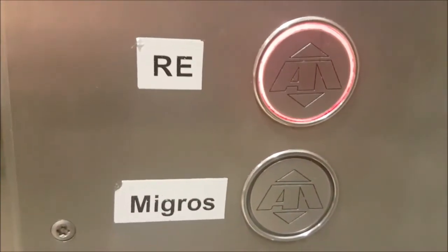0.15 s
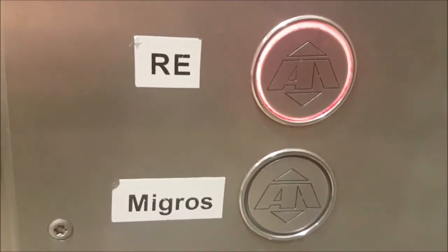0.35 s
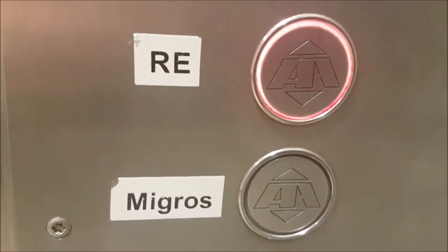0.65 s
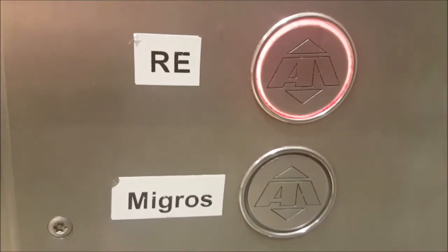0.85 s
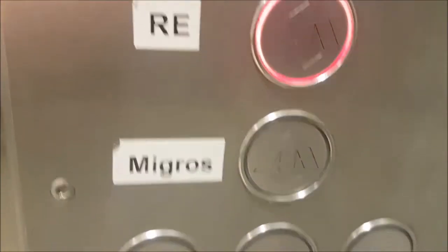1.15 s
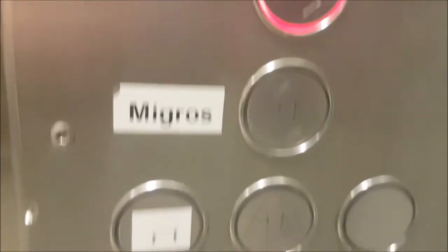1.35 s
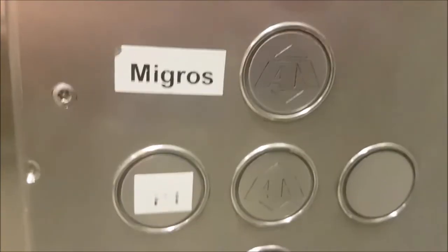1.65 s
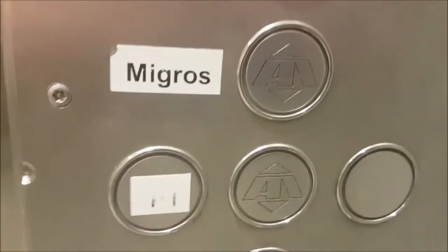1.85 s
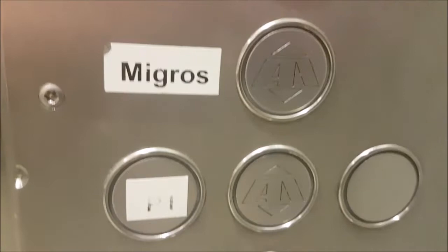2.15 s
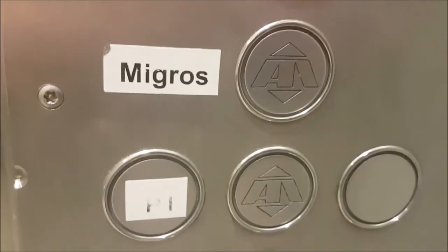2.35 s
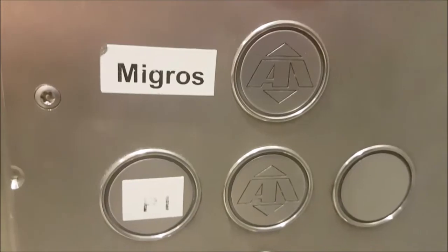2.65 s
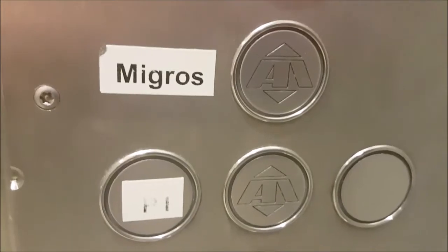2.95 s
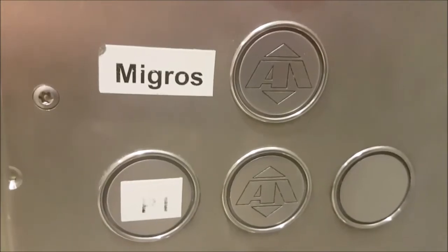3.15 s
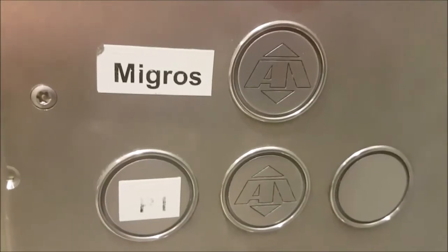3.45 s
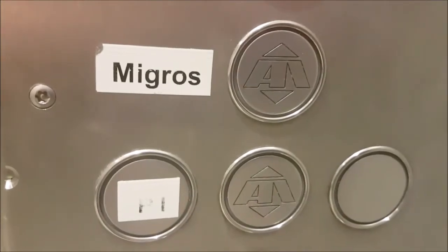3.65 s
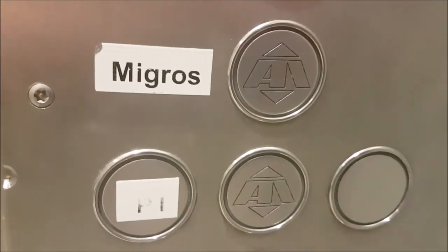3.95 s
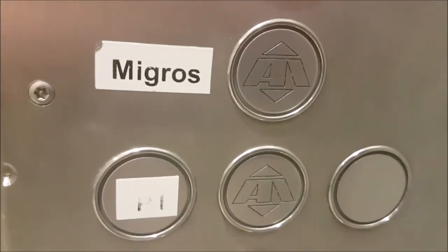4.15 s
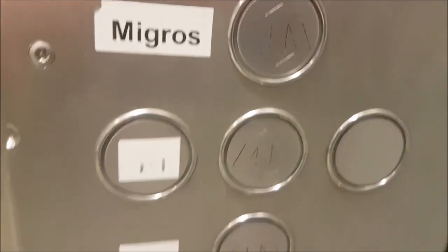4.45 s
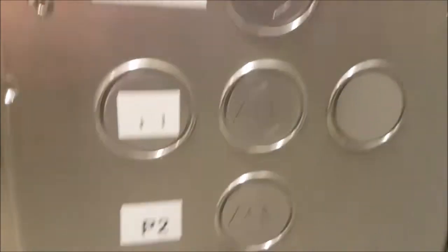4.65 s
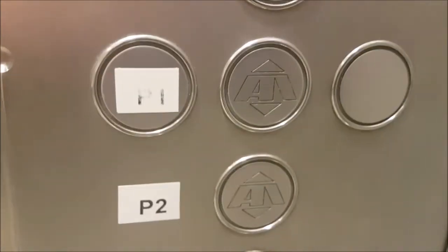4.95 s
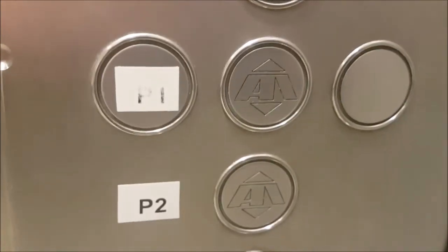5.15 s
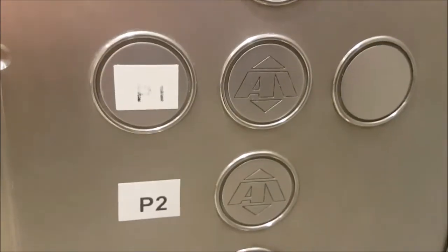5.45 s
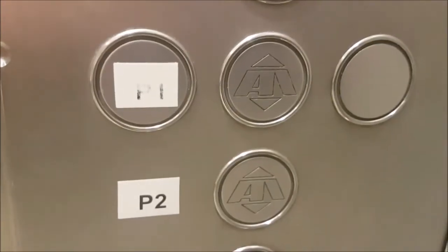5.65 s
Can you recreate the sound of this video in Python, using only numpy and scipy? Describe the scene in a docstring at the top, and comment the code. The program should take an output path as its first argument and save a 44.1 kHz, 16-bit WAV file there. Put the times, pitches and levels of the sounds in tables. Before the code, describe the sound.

A lift cabin travels with a continuous deep boom around 80 hertz, beating and swelling unevenly over soft rolling noise. A hand holding the recorder shifts: a thump and rub just after one second, another before two, then the strongest cluster of knocks at about four and a half. One side is muffled by the hand, with heavy thumps; the other is open, with skin hiss and small clicks.

```python
"""The cabin of a travelling lift car booms near 80 Hz, as random shaking rings two close modes.
Below the boom lies the rolling of its guides in the shaft: coloured noise with a fluttering level.
A hand shifts its grip on the recorder: friction noise for sliding skin, damped pulses for knocks, clicks for ticks.
The hand covers the left port, which hears the ride muffled and the knocks as thumps; the right port is open."""
import sys
import numpy as np
from scipy import signal
from scipy.fft import rfft, irfft, next_fast_len
from scipy.io import wavfile
from scipy.ndimage import uniform_filter1d, map_coordinates

SR = 44100
rng = np.random.default_rng(int(sys.argv[2]) if len(sys.argv) > 2 else 0)


def generate_wav(sig):
    """Save sig (samples, or channels by samples) to the path in sys.argv[1] as 16-bit PCM at SR."""
    pcm = np.round(np.clip(np.atleast_2d(sig).T, -1, 1) * 32767).astype(np.int16)
    wavfile.write(sys.argv[1], SR, pcm)


N = 255780
TIME_S = np.arange(N) / SR

# Swelling of the cabin's boom. Each row: time in seconds, relative level in dB.
BOOM_SWELL = [(0.0, -32), (0.71, -24), (0.82, -36.5), (1.11, -29), (1.27, -37.5), (1.38, -24.5),
              (1.59, -33.5), (2.1, -26.5), (2.18, -37), (2.55, -24), (2.76, -33), (2.88, -23.5), (3.1, -30),
              (3.3, -20.5), (3.4, -32.5), (3.54, -24.5), (3.61, -30), (4.38, -31.5), (4.53, -26.0),
              (4.89, -33.5), (4.96, -26.5), (5.48, -25.5), (5.6, -38.3), (5.79, -29)]
# Low modes of the cabin. Each row: centre in Hz, damping width in Hz, relative level in dB.
CABIN_MODES = [(73, 9, -2), (81.5, 9, -1)]
# Loudness of the guides' rolling. Each row: time in seconds, level in dB.
ROLLING_LEVEL = [(0, -37), (1, -36.5), (1.95, -33), (2.35, -34.5), (3, -34.5), (5.3, -37), (5.8, -39)]
# Rolling noise as it comes through the cabin walls. Each row: frequency in Hz, relative density in dB.
ROLLING_SPECTRUM = [(20, -71.5), (45, -63), (105, -56), (165, -58), (260, -69), (420, -75), (560, -74),
                    (800, -84), (1300, -86), (1800, -87.5), (2900, -88), (3400, -99.5), (6100, -100.3),
                    (8000, -124)]
# Hiss of sliding skin. Each row: frequency in Hz, relative density in dB.
SKIN_SPECTRUM = [(300, -27.5), (1000, -6), (1700, -10), (2700, -2), (3800, -9.5), (6000, -4.5), (7200, -14),
                 (9000, -26.5), (11000, -10.5), (13500, -10), (15500, -11.5)]
# Scrape of sliding skin. Each row: frequency in Hz, relative density in dB.
SCRAPE_SPECTRUM = [(60, -32.5), (200, 5), (450, 6), (1000, -6.5), (2500, -11.5), (5000, -23.5), (9000, -62)]
# Rumble of skin over the covered port. Each row: frequency in Hz, relative density in dB.
RUB_SPECTRUM = [(15, -41.5), (35, -21), (90, 1.5), (160, 3), (260, -15.5), (420, -21), (800, -33),
                (3000, -96)]
# Strokes of skin over the case. Each row: start in seconds, attack in seconds, hold in seconds,
# release to -20 dB in seconds, relative levels of hiss, scrape and rub in dB, treble sheen against
# the hiss in dB, pitch of the hand's hollow at first and at last in Hz.
STROKES = [(0.0, .06, 0.12, 0.72, -58, -63, -63.5, -2, 2700, 2408),
           (0.197, .06, .11, 0.04, -59.5, -51, -56.5, -5.5, 2500, 2200),
           (0.52, 0.068, .5, 0.35, -66.5, -59, -59.5, -1.5, 601, 2497),
           (1.118, 0.1258, .09, 0.2974, -41.5, -38.5, -34, -.5, 2764, 2506),
           (1.29, .1, 0.1026, 0.148, -45, -40, -32, .5, 1150, 901),
           (1.701, 0.0209, 0.0728, .055, -51.5, -42.5, -38, -3, 1100, 901),
           (1.8, .08, .14, 0.34, -62.5, -55, -48, -5, 2200, 699.4),
           (2.169, 0.092, .62, 0.35, -60, -53, -54.5, -6.5, 2500, 2020),
           (2.54, 0.111, 0.065, 0.24, -47, -49.5, -49, -6.5, 2185, 1898),
           (4.49, 0.1183, 0.0766, 0.1627, -39, -37.5, -33.5, -1.2, 1800, 850),
           (4.661, 0.0532, .03, 0.0829, -53, -38, -32.5, -1, 848.6, 700),
           (4.784, 0.034, 0.056, 0.07, -61.5, -54, -50.5, -3.5, 901, 781.6)]
# Knocks of the hand on the case. Each row: start in seconds, thump gain in dB, thump pitch in Hz,
# time to the thump's fullest swell in seconds, push gain at the open port in dB.
KNOCKS = [(1.1355, -1.5, 97, 0.00748, -11.5), (1.157, -18.5, 45, 0.0265, -50),
          (1.275, -24, 195.5, 0.00476, -46.5), (1.7246, -4.5, 106.6, 0.00504, -11),
          (1.888, -10.5, 65.8, 0.0066, -24), (4.406, -11, 69.6, 0.00835, -40.5),
          (4.5032, 1.5, 112.7, 0.00502, -1.5), (4.513, -10, 58.6, 0.00497, -50),
          (4.559, -11.5, 166, 0.0044, -40), (4.571, -3.5, 94.3, 0.00543, -40),
          (4.58, -9.5, 35.9, 0.0154, -53), (5.187, -37, 572, 0.00154, -35.5)]
# Skin catching on the case. Each row: start in seconds, relative level in dB.
TICKS = [(1.1352, -36.5), (1.1979, -30.5), (1.7125, -33.5), (1.973, -43.5), (4.09, -47.5), (4.1553, -50.5),
         (4.5037, -18), (4.559, -25.5), (5.187, -42.5)]
# Colour of a tick. Each row: frequency in Hz, relative level in dB.
TICK_SPECTRUM = [(300, -1), (1000, -1.5), (2200, 6), (3600, -1.5), (6000, -2.5), (9000, -27), (12000, -14),
                 (15500, -18)]
# The hand trembling on the covered port. Each row: frequency in Hz, relative density in dB.
TREMOR_SPECTRUM = [(15, 29), (35, -26), (60, 30.5), (120, 22), (300, -5), (1000, -122)]
# Faint background at each port. Each row: frequency in Hz, relative density in dB.
HISS_SPECTRUM = [(400, -105), (1000, -90.5), (1700, -91.5), (2300, -101), (3300, -103), (6000, -111),
                 (9000, -117), (12000, -113), (15500, -114)]

HISS_SAG_DB, SCRAPE_SAG_DB = 4, 1  # lost over a stroke's hold as the skin slows down
REST_DB = -76  # creep of the resting hand, on the scale of the strokes' hiss
TOP_HZ = 15850


def amp(db):
    """Decibels to gain."""
    return 10 ** (np.asarray(db) / 20)


def unit(x):
    """x at rms 1."""
    return x / np.sqrt(np.mean(x ** 2) + 1e-20)


def along(points, hz):
    """(Hz, value) points read on a log axis."""
    point_hz, value = np.transpose(points)
    return np.interp(np.log(hz + 1), np.log(point_hz + 1), value)


def curve(rows):
    """(seconds, value) rows read at every sample."""
    time_s, value = np.transpose(rows)
    return np.interp(TIME_S, time_s, value)


def wobble(knots_per_s):
    """A smooth random curve through normally distributed knots."""
    knots = rng.standard_normal(int(N * knots_per_s / SR) + 4)
    return map_coordinates(knots, [TIME_S * knots_per_s])


def filtered(x, response):
    """x times a complex response of frequency."""
    padded = next_fast_len(N + SR // 2)
    hz = np.fft.rfftfreq(padded, 1 / SR)
    return irfft(rfft(x, padded) * response(hz), padded)[..., :N]


def coloured(x, spectrum):
    """x shaped by the given spectrum, at rms 1."""
    return unit(filtered(x, lambda hz: amp(along(spectrum, hz))))


def noise(spectrum):
    """Fresh noise of rms 1 with the given spectrum."""
    return coloured(rng.standard_normal(N), spectrum)


def resonance(hz, centre_hz, width_hz):
    """Response of one damped mode, 1 at its centre."""
    damping = 1j * hz * width_hz
    return damping / (centre_hz ** 2 - hz ** 2 + damping)


def boom(level_db=0.35, evenness=0.26):
    """Shaking rings the cabin's close low modes, which beat against each other as the boom swells and fades."""
    def modes(hz):
        return sum(amp(db) * np.abs(resonance(hz, centre_hz, width_hz)) ** 2
                   for centre_hz, width_hz, db in CABIN_MODES)

    ring = signal.hilbert(unit(filtered(rng.standard_normal(N), modes)))
    slow_power = uniform_filter1d(np.abs(ring) ** 2, size=SR // 6)
    ring = ring / np.sqrt(np.abs(slow_power))  # keep only the quick beats
    beating = unit(ring.real / (np.abs(ring) + 0.18) ** evenness)  # milder beats
    return amp(curve(BOOM_SWELL) + level_db) * beating


def guides(flutter_db=0.9446):
    """Guide shoes run along the rails; their noise flutters with the unevenness of the track."""
    level_db = curve(ROLLING_LEVEL) + flutter_db * wobble(12)
    return amp(level_db) * noise(ROLLING_SPECTRUM)


def grains(rough_db):
    """Friction: countless tiny slips of very unequal size."""
    return rng.standard_normal(N) * amp(rough_db * wobble(900))


def stroke(start_s, attack_s, hold_s, release_s, sag_db):
    """Gain of one stroke: the skin speeds up, slides on while slowing, and comes to rest."""
    t = TIME_S - start_s
    rise = np.sin(np.pi / 2 * np.clip(t / attack_s, 0, 1)) ** 2
    slowing = np.clip((t - attack_s) / hold_s, 0, 1)
    release_db = 20 * np.maximum(t - attack_s - hold_s, 0) / release_s
    return rise * amp(-sag_db * slowing - release_db)


def hand():
    """All strokes, added in power, as gains of hiss, sheen, scrape and rub, with the gliding hollow in Hz."""
    hiss = sheen = np.full(N, amp(REST_DB))
    scrape, rub, hollow_hz = np.zeros((3, N))
    for start_s, attack_s, hold_s, release_s, hiss_db, scrape_db, rub_db, sheen_db, first_hz, last_hz in STROKES:
        fine = stroke(start_s, attack_s, hold_s, release_s, HISS_SAG_DB)
        coarse = stroke(start_s, attack_s, hold_s, release_s, SCRAPE_SAG_DB)
        progress = np.clip((TIME_S - start_s - attack_s) / hold_s, 0, 1)
        glide_hz = first_hz * (last_hz / first_hz) ** progress
        firmer = amp(scrape_db) * coarse >= scrape  # than all earlier strokes together
        hollow_hz = np.where(firmer, glide_hz, hollow_hz)
        hiss = np.hypot(hiss, amp(hiss_db) * fine)
        sheen = np.hypot(sheen, amp(hiss_db + sheen_db) * fine)
        scrape = np.hypot(scrape, amp(scrape_db) * coarse)
        rub = np.hypot(rub, amp(rub_db) * coarse)
    return hiss, sheen, scrape, rub, hollow_hz


def hollowed(scrape, hollow_hz):
    """The hollow of the hand resonates, lifting the band of the scrape around its gliding pitch."""
    hz, frame_s, spectra = signal.stft(scrape, SR, nperseg=512)
    centre_hz = uniform_filter1d(np.interp(frame_s, TIME_S, hollow_hz), size=9)
    lift = 1 + 1.7 * np.abs(resonance(hz[:, None], centre_hz, 0.6 * centre_hz)) ** 2
    return unit(signal.istft(spectra * lift, nperseg=512)[1][:N])


def slides(hiss_db=4, scrape_db=1, rub_db=1):
    """Sliding skin hisses and scrapes at the open port and rumbles under the covered one."""
    fine, sheen, coarse, pressure, hollow_hz = hand()
    skin = coloured(grains(rough_db=2.5), SKIN_SPECTRUM)
    top = filtered(skin, lambda hz: np.clip((hz - 7000) / 3000, 0, 1))
    hiss = amp(hiss_db + 0.77 * wobble(50)) * (fine * (skin - top) + sheen * top)
    rasp = hollowed(coloured(grains(rough_db=3), SCRAPE_SPECTRUM), hollow_hz)
    scrape = coarse * amp(scrape_db + 1.79 * wobble(60)) * rasp
    rub = pressure * amp(rub_db + 2.5 * wobble(25)) * noise(RUB_SPECTRUM)
    return np.array([rub, hiss + scrape])


def knocks(push_s=0.000964, lag_s=0.0001447, bite_s=0.00023):
    """Each knock squeezes the air under the hand into a damped thump; the open port gets a short push and rebound."""
    out, t = np.zeros((2, N + SR)), np.arange(SR // 4) / SR
    late = np.maximum(t - lag_s, 0)
    for start_s, thump_db, pitch_hz, swell_s, open_db in KNOCKS:
        u = t / swell_s
        thump = -(u * np.exp(1 - u)) ** 1.477 * np.sin(2 * np.pi * pitch_hz * t)
        onset = (1 - np.exp(-late * amp(open_db) / bite_s)) ** 2  # a light touch lands more slowly
        push = -3 * (1 - late / push_s) * np.exp(-late / push_s) * onset
        first = round(start_s * SR)
        out[:, first:first + len(t)] += [amp(thump_db) * thump, amp(open_db) * push]
    return out[:, :N]


def ticks(t60_s=0.014, level_db=3):
    """Skin catches and lets go beside the open port: one dry snap and a faint scatter of smaller slips."""
    out, t = np.zeros(N + SR), np.arange(2048) / SR
    colour = amp(along(TICK_SPECTRUM, np.fft.rfftfreq(len(t), 1 / SR)))
    # folding the cepstrum makes the snap minimum phase: it starts at once
    half = len(t) // 2 - 1
    fold = np.r_[1, np.full(half, 2), 1, np.zeros(half)]
    snap = irfft(np.exp(rfft(irfft(np.log(colour)) * fold)))
    for start_s, db in TICKS:
        scatter = unit(irfft(rfft(rng.standard_normal(len(t))) * colour))
        slips = scatter * amp(-60 * t / t60_s)
        click = 0.25 * slips - 2 * snap / np.abs(snap).max()
        first = round(start_s * SR)
        out[first:first + len(t)] += amp(db + level_db) * click
    return out[:N]


def muffled(ride, corner_hz=440, level_db=-3.0):
    """The covering hand acts as two equal one-pole low-passes in a row."""
    return amp(level_db) * filtered(ride, lambda hz: 1 / (1 + 1j * hz / corner_hz) ** 2)


def tremor(level_db=-49):
    """The trembling hand presses on the covered port: low noise of slowly wandering level."""
    return amp(level_db + 2.6 * wobble(1.4)) * noise(TREMOR_SPECTRUM)


def background(level_db=-61):
    """Faint steady hiss, independent at each port."""
    return amp(level_db) * np.array([noise(HISS_SPECTRUM), noise(HISS_SPECTRUM)])


def scene():
    """The ride reaches the right port freely and the left one through the slightly trembling hand."""
    ride = boom() + guides()
    left = muffled(ride) + tremor()
    right = ride + ticks()
    return np.array([left, right]) + slides() + knocks() + background()


def record(dry):
    """The recorder rounds off peaks near full scale and keeps nothing above its band limit."""
    rounded = dry / (1 + np.abs(dry) ** 8) ** (1 / 8)
    return filtered(rounded, lambda hz: hz < TOP_HZ)


dry = scene()
out = record(dry)
generate_wav(out)
```